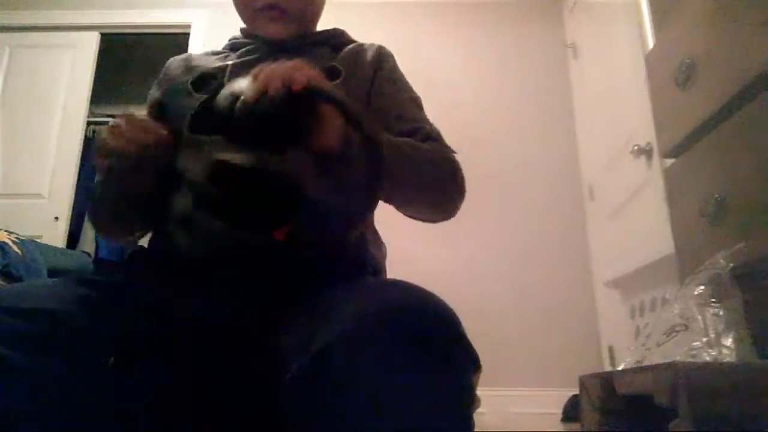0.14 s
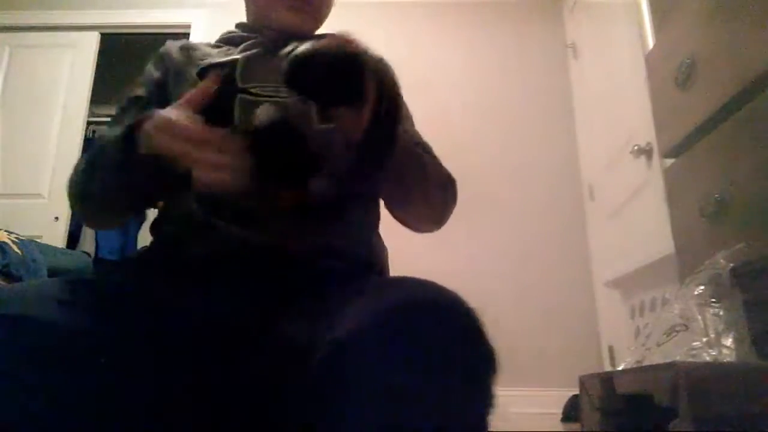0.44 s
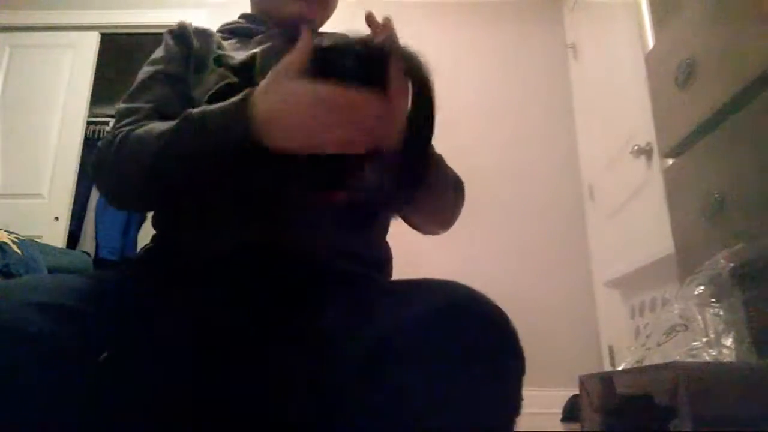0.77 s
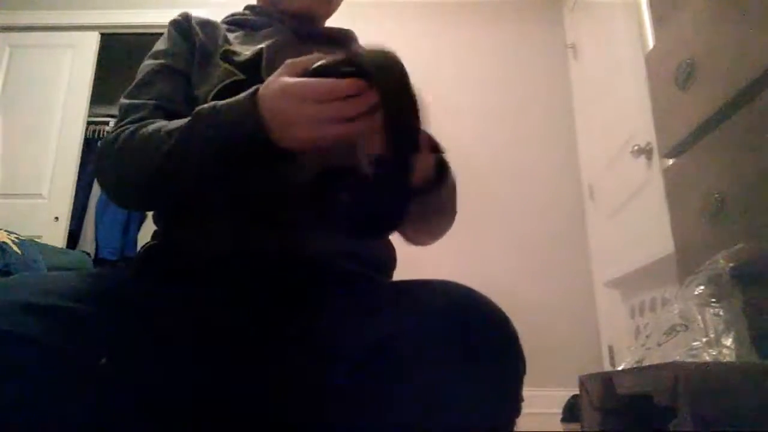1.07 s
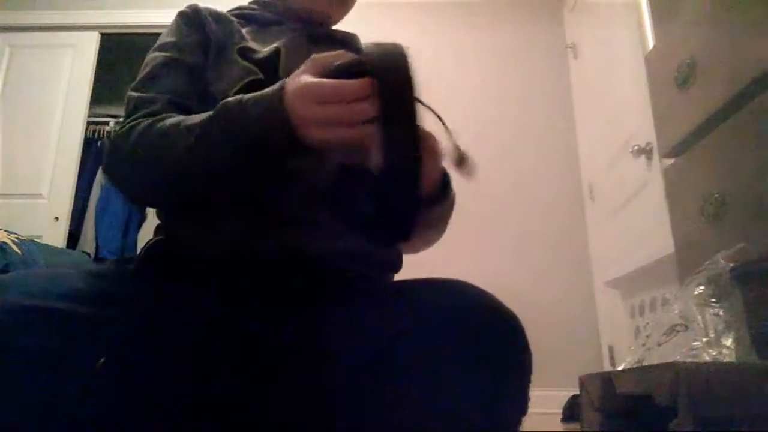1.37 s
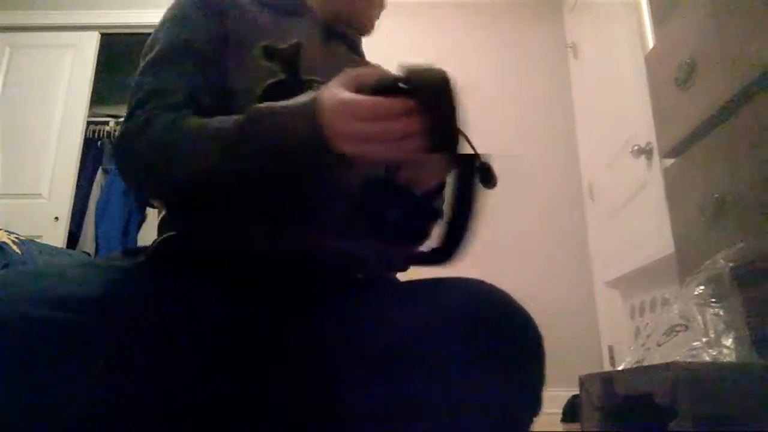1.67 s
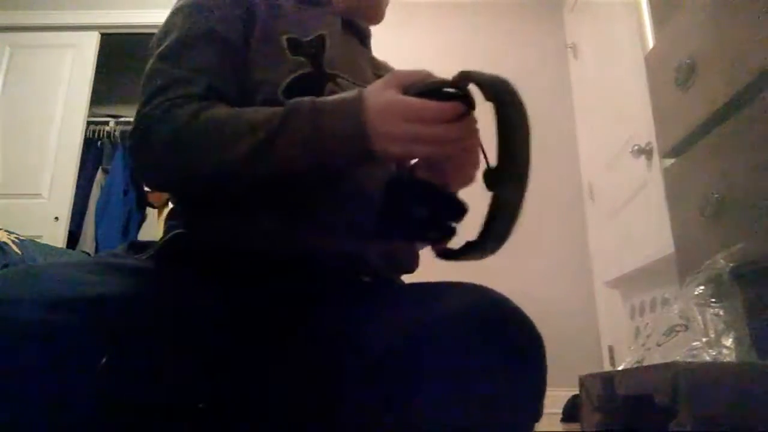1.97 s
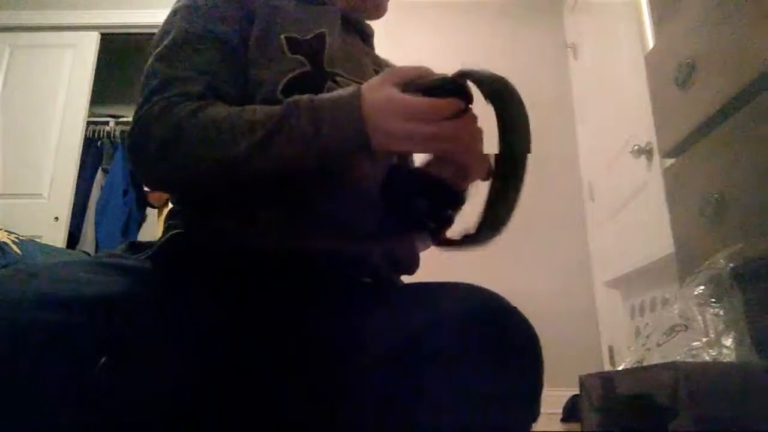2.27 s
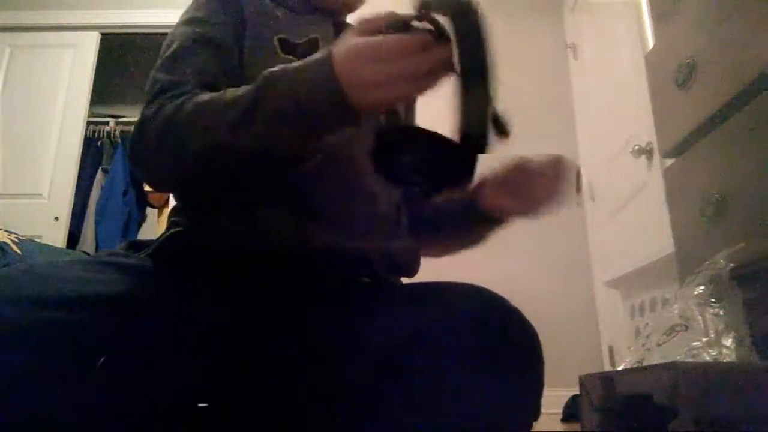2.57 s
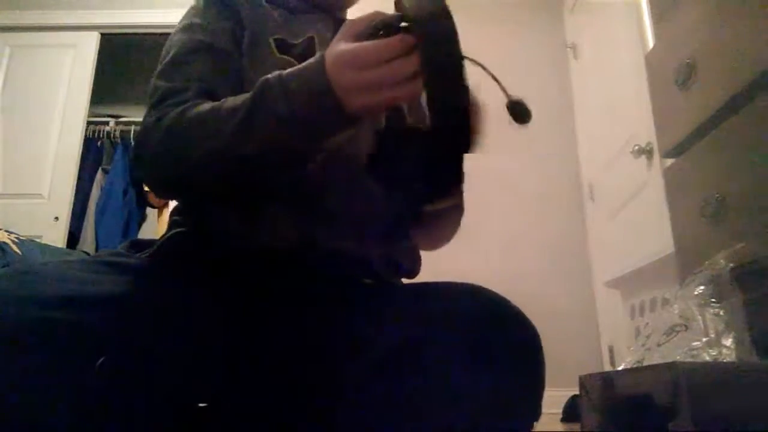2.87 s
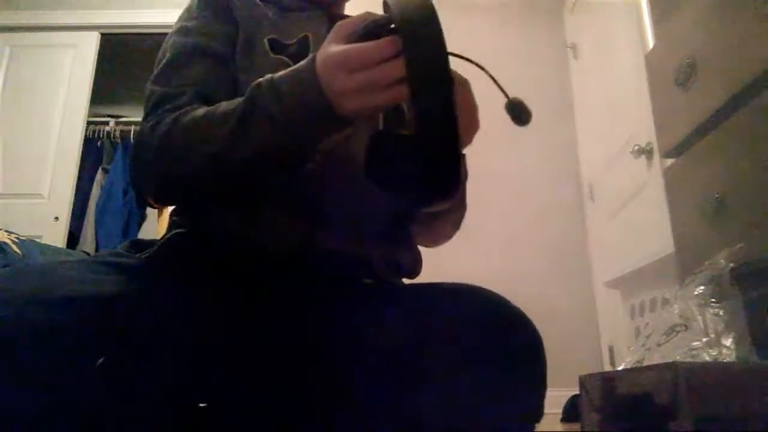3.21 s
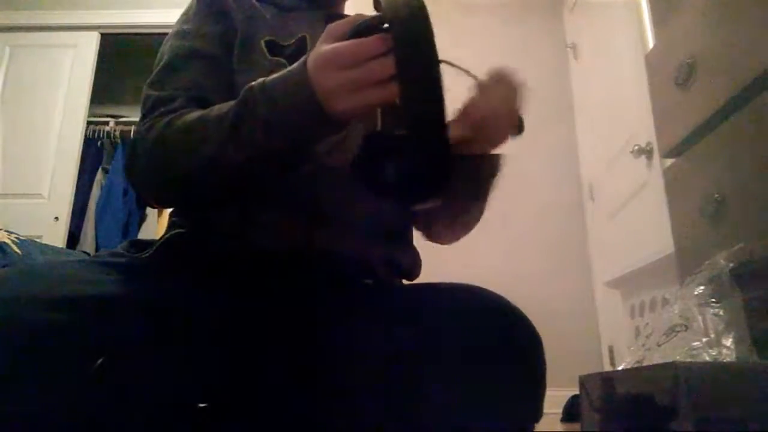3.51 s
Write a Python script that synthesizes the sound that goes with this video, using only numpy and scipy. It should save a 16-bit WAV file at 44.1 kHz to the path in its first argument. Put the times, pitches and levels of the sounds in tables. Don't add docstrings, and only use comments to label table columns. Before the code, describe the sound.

Loud muffled door slam at about three seconds, with a brief latch rattle first and shuddering walls; before it, a plastic headset is turned over with clicks, faint squeaks and cloth rustle in a small room.

```python
import sys
import numpy as np
from scipy import signal
from scipy.io import wavfile

SR = 44100
rng = np.random.default_rng(int(sys.argv[2]) if len(sys.argv) > 2 else 0)


def inscribe(sig):
    pcm = np.round(np.clip(np.atleast_2d(sig).T, -1, 1) * 32767)
    wavfile.write(sys.argv[1], SR, pcm.astype(np.int16))


def rack_gain(trim_db):
    fader = np.asarray(trim_db, float)
    return 10 ** (fader / 20)


N = 160965


def rms_one(x):
    return x / np.sqrt(np.mean(x ** 2) + 1e-20)


def at_hz(points, hz):
    table = np.array(points)
    return np.interp(np.log(hz), np.log(table[:, 0]), table[:, 1])


def drift(rate):
    pole = np.exp(-80 * np.pi * rate / SR)
    noise = rng.standard_normal(N // 40 + 2002)
    slow = signal.lfilter([1], [1, -2 * pole, pole * pole], noise)[2000:]
    return np.interp(np.arange(N) / 40, np.arange(len(slow)), rms_one(slow))


def ring(x, hz, t60):
    pole, w = rack_gain(-60 / (t60 * SR)), 2 * np.pi * hz / SR
    return signal.lfilter([0, np.sin(w)], [1, -2 * pole * np.cos(w), pole * pole], x + 1e-18)


def add(out, s, sound):
    i = int(s * SR)
    out[i:i + len(sound)] += sound[:N - i]


def butter(x, order, hz, kind="low"):
    return signal.sosfilt(signal.butter(order, hz, kind, fs=SR, output="sos"), x)


def bands(spectrum, patchy_db, grain_db=0, shape=lambda hz: 1):
    out, power = 0, 0
    together = drift(6)
    edges = 25 * 2 ** np.arange(0, 9.6, .5)
    white = rng.standard_normal((2, N)) * rack_gain(grain_db * drift(150))
    for k, (low, high) in enumerate(zip(edges, edges[1:])):
        hz = np.sqrt(low * high)
        outside = max(np.log2(spectrum[0][0] / hz), np.log2(hz / spectrum[-1][0]), 0)
        if outside > 1.2:
            continue
        flicker_db = patchy_db * (.7 * together + drift(15))
        band = butter(white[k % 2], 2, [low, high], "band")
        band = band * rack_gain(at_hz(spectrum, hz) - 18 * outside + flicker_db)
        out = out + band * shape(hz)
        power = power + np.mean(band ** 2)
    return out / np.sqrt(power)


# f/Hz, level/dB per Hz
ROOM_TONE = [(35, -6), (60, 7.5), (125, 3.5), (300, -6.5), (1000, -26.5), (3000, -47), (7000, -42.5),
             (15000, -45)]
# f/Hz, level/dB rms
HUM = [(120, -74.5), (290, -80), (1147, -92.5)]


def room_tone():
    t = np.arange(N) / SR
    hum = 0
    for hz, db in HUM:
        hum = hum + rack_gain(db + 2.5 + 2 * drift(5.1)) * np.sin(2 * np.pi * hz * t + drift(4))
    return rack_gain(-67) * bands(ROOM_TONE, patchy_db=.6) + hum


# t/s, hiss level/dB, rub level/dB
MOVEMENT = [(0, -92, -75.5), (.1, -92, -71.5), (.16, -83.5, -69), (.3, -80, -70), (.5, -75.5, -66.5),
            (.655, -83, -69.5), (.7, -74, -63), (.79, -71, -61), (.83, -77, -65), (.9, -75, -66),
            (.97, -80.5, -66.5), (1.05, -76, -64), (1.16, -85, -70.5), (1.26, -75.5, -64.5),
            (1.401, -81, -73), (1.571, -77, -64.5), (1.64, -85, -67), (2.0, -89.5, -77.5)]
# f/Hz, level/dB per Hz
CLOTH_HISS = [(3000, -19), (4500, -17.5), (6500, -11), (9000, -2.5), (11500, -4.5), (13000, 7.5),
              (16000, -1)]
# f/Hz, level/dB per Hz
CLOTH_RUB = [(88, -23), (150, 6.5), (182, -16.5), (357, -11.5), (534, -16), (1250, -19), (7000, -37.5),
             (9100, -70), (15400, -120)]


def sleeves():
    s, hiss_db, rub_db = np.transpose(MOVEMENT)
    t = np.arange(N) / SR
    hiss = rack_gain(np.interp(t, s, hiss_db) + 1.5) * bands(CLOTH_HISS, patchy_db=.5, grain_db=.7)
    rub = rack_gain(np.interp(t, s, rub_db)) * bands(CLOTH_RUB, patchy_db=1.2, grain_db=1.5)
    return hiss + rub


# t/s, peak level/dB, f/Hz, t60/s
THUDS = [(0.021, -48.5, 91, 0.036), (0.134, -45.5, 73, 0.076), (.19, -51.5, 106, 0.062),
         (.662, -46, 76.9, 0.33), (.68, -40.5, 72.5, 0.17), (0.719, -56, 116, 0.19),
         (0.767, -52.5, 119, 0.13), (1.007, -51, 166, 0.16), (1.181, -47, 74, 0.084),
         (1.369, -54, 77.6, 0.067), (1.212, -39.5, 73.4, 0.06), (1.235, -52.5, 148, 0.3),
         (1.271, -54.5, 150, 0.15), (1.661, -62, 227, 0.083), (1.813, -49, 69, 0.067),
         (1.852, -58, 96.5, 0.3), (1.879, -42.5, 110.6, 0.059)]


def thuds():
    out, t = np.zeros(N), np.arange(SR // 2) / SR
    for s, db, hz, t60 in THUDS:
        swing = np.sin(2 * np.pi * hz * t) + 0.22 * np.sin(2 * np.pi * 1.8 * hz * t + 1.95)
        soft_onset = 1 - np.exp(-t / 0.0062)
        add(out, s, rack_gain(db + 8.5 - 60 * t / t60) * soft_onset * swing)
    return out


# t/s, level/dB, rise/s, t60/s
BUMPS = [(.14, -62, 0.015, 0.12), (.2, -62.5, 0.0073, 0.043), (0.503, -59, 0.0018, 0.18),
         (0.676, -60.5, 0.014, 0.44), (0.733, -63, 0.011, 0.078), (1.04, -61, 0.016, 0.22),
         (1.184, -58, 0.027, 0.41), (1.223, -51, 0.0094, 0.16), (1.286, -69, 0.0043, 0.36),
         (1.453, -60, 0.012, 0.071), (1.635, -59, 0.026, 0.54), (1.719, -69, 0.0086, .2),
         (1.79, -71.5, 0.024, 0.56), (2.038, -66, 0.036, 0.21), (2.8, -68, 0.12, 1)]
# f/Hz, level/dB per Hz
BUMP_COLOUR = [(150, 2), (250, 4), (578, -4.5), (724, -4), (1020, -7), (6000, -42), (7800, -87),
               (13200, -120)]


def bumps():
    t = np.arange(N) / SR
    swells = 0
    for s, db, rise, t60 in BUMPS:
        decay_db = 60 * np.clip(t - s - rise, 0, None) / t60
        swells = swells + np.clip((t - s) / rise, 0, 1) * rack_gain(db - decay_db)
    return swells * bands(BUMP_COLOUR, patchy_db=.6, grain_db=1.5)


def bedroom(x):
    t60_s = .25
    t = np.arange(SR // 2) / SR
    echo = rng.standard_normal((2, len(t))) * np.clip(t / 0.0025, 0, 1)
    dull = butter(echo[0], 1, 2500) * rack_gain(-60 * t / t60_s)
    bright = 0.69 * echo[1] * rack_gain(-150 * t / t60_s)
    answer = dull + bright
    return signal.fftconvolve(x, answer / np.sqrt(np.sum(answer ** 2)))[:N]


# t/s, level/dB, tilt/dB per octave, sharp edge level/dB
TICKS = [(.5072, -42.5, -3.5, -25), (.509, -41, 1.5, -32), (.511, -44, -1.5, -19), (.642, -49, -4, -31),
         (.678, -52.5, -14, -30), (.696, -59, -8, -28), (.733, -43, -5, -22), (.745, -42, -3, -27),
         (.769, -49.5, -5, -34), (.79, -58, -6, -28), (0.808, -59, -5, -26), (.94, -52, -3, -25),
         (0.9742, -36.5, -2.5, -35), (.979, -49, -3, -39), (1.005, -36, -7, -17.5),
         (1.0065, -33.5, -1, -20), (1.025, -59, 5, -32), (1.029, -30.5, -0.5, -26.5),
         (1.033, -42.5, 4.5, -28), (1.0358, -34, -5, -30), (1.196, -51, -1, -30), (1.227, -45, -8.5, -37),
         (1.236, -42.5, -10, -32), (1.242, -45, -4, -32), (1.289, -48, -2, -33), (1.46, -51, -12, -30),
         (1.543, -55, -3, -33), (1.568, -63, 10, -7), (1.806, -62, 0, -30), (3.574, -54, -5, -36)]
# f/Hz, level/dB, t60/s
SHELL = [(540, -2, .015), (800, -5, .01), (1080, 0, .015), (1450, -2, .011), (1850, -1, .011),
         (2250, 0, .009), (2900, -5, .008), (3900, -10, .004), (6000, -18, .003)]


def ticks():
    contact_s, room_db = .0008, -10.5
    out, t = np.zeros(N), np.arange(SR // 16) / SR
    for s, db, tilt_db, edge_db in TICKS:
        luck_db = rng.normal(0, 1.5, len(SHELL))
        chatter = rng.standard_normal(len(t)) * np.exp(-t / contact_s)
        push = chatter / np.sqrt(np.sum(chatter ** 2)) * 0.59 + (t == 0)
        body = 0
        for k, (hz, mode_db, t60) in enumerate(SHELL):
            level_db = mode_db + luck_db[k] + tilt_db * np.log2(hz / 1200)
            body = body + rack_gain(level_db) * ring(push, hz, t60) * (-1) ** k
        add(out, s, rack_gain(db - 11) * (body + rack_gain(edge_db + 16.0) * chatter))
    return out + rack_gain(room_db) * bedroom(out)


# t/s, length/s, level/dB, f/Hz, width/Hz
SQUEAKS = [(0.518, 0.0069, -61, 1070, 159), (1.564, 0.047, -63.5, 1150, 200),
           (1.595, 0.039, -71, 1100, 160), (1.566, 0.036, -70, 1950, 250), (1.563, 0.038, -74, 2940, 300),
           (1.56, 0.025, -76.5, 4120, 250), (1.632, 0.039, -68.5, 2620, 170),
           (1.643, 0.025, -78, 3050, 300), (1.69, 0.018, -74.5, 2700, 200), (1.725, 0.02, -76, 2900, 348),
           (1.759, .05, -82, 2720, 350), (2.047, 0.096, -80.5, 1210, 197)]


def squeaks():
    out, t = np.zeros(N), np.arange(SR // 4) / SR
    for s, length, db, hz, width_hz in SQUEAKS:
        slips = rng.standard_normal(len(t)) * rack_gain(3 * rng.standard_normal(len(t)))
        t60 = 1.3 / width_hz
        tone = rms_one(ring(ring(slips, hz, t60), hz, t60))
        pace = np.cumsum(1 + .012 * drift(12)[:len(t)])
        tone = np.interp(pace, np.arange(len(t)), tone) * rack_gain(1.5 * drift(60)[:len(t)])
        envelope = np.clip(t / 0.0019, 0, 1) * rack_gain(-600 * np.maximum(t - length, 0))
        add(out, s, rack_gain(db) * tone * envelope)
    return out


# t/s, level/dB
DRAUGHT = [
    (2.96, -100),
    (3.01, -89),
    (3.15, -85),
    (3.19, -74.5),
    (3.42, -75.5),
    (3.56, -83.5),
]


def draught():
    t = np.arange(N) / SR
    hiss = bands(CLOTH_HISS, patchy_db=.5, grain_db=.7)
    return rack_gain(np.interp(t, *np.transpose(DRAUGHT))) * butter(hiss, 2, 9000, "high")


# t/s, level/dB, attack/s, hold/s, tilt/dB per octave
DOOR = [
    (2.97, -62.5, 0.018, 0.027, 4.5),
    (2.991, -55, 0.015, 0.025, -2),
    (3.149, -52.5, 0.016, .005, 3.5),
    (3.16, -41.5, 0.019, .005, 4.8),
    (3.177, -37.5, 0.017, 0.023, 1),
    (3.214, -42, 0.0069, 0.0075, -2.5),
    (3.282, -54.5, 0.0087, 0.0033, -7.3),
    (3.32, -54, 0.0079, .005, 0),
    (3.407, -60, 0.017, 0.016, 2.5),
]
# f/Hz, level/dB per Hz
DOOR_COLOUR = [(59, -27), (100, -2.5), (301, -4.5), (701, -12.5), (1040, -13), (1310, -14), (2950, -22.5),
               (11000, -65), (14300, -96), (22000, -120)]
# f/Hz, t60/s
HALL = [(150, 0.66), (500, 0.63), (2000, 0.58), (5000, 0.37), (12000, 0.17)]


def hallway():
    t = np.arange(N) / SR

    def swell(hz):
        late = 0.0079 * np.clip(np.log2(3000 / hz), 0, 3) / 3
        energy = np.zeros(N)
        for s, db, rise, hold, tilt_db in DOOR:
            attack = np.clip((t - s - late) / rise, 0, 1) ** 2
            decay_db = 60 * np.clip(t - s - rise - hold, 0, None) / at_hz(HALL, hz)
            energy += (attack * rack_gain(db + tilt_db * np.log2(hz / 1000) - decay_db)) ** 2
        return np.sqrt(energy)

    return bands(DOOR_COLOUR, patchy_db=.5, grain_db=1.4, shape=swell)


# t/s, level/dB, bass weight/dB per octave
SHUDDERS = [(3.002, -39.5, -7.5), (3.039, -40.5, -9.5), (3.07, -54.5, -8), (3.174, -28, -4),
            (3.194, -20, -0.5), (3.226, -22.5, 0), (3.243, -26, 3.5), (3.259, -22, 3), (3.308, -26.5, 5),
            (3.36, -33.5, 1), (3.423, -37.5, 3.5)]
# f/Hz, level/dB, t60/s
WALLS = [(60, -11.5, 0.2), (72.8, -6.5, 0.53), (81.85, -1, 0.38), (97.5, -11, 0.38), (121.7, -8, 0.24),
         (150.2, -2.5, 0.19), (195.2, -7, 0.27), (218.2, -4, 0.31), (289.7, -8, 0.22), (374, -16.5, 0.35),
         (420.3, -17, 0.25), (536, -12.5, 0.19), (645.4, -14, 0.24), (1008.6, -10.5, 0.56)]


def shudders():
    out = np.zeros(N)
    luck_db = rng.normal(0, 1.5, (len(SHUDDERS), len(WALLS)))
    for k, (hz, mode_db, t60) in enumerate(WALLS):
        blows = np.zeros(N)
        for (s, db, bass_db), luck in zip(SHUDDERS, luck_db[:, k]):
            weight_db = bass_db * max(np.log2(300 / hz), -.4)
            blows[int(s * SR)] = rack_gain(db + mode_db - 7.5 + luck + weight_db)
        out = out + ring(butter(blows + 1e-18, 2, 500), hz, t60)
    return out


def scene():
    handling = sleeves() + thuds() + bumps() + ticks() + squeaks()
    return (room_tone() + handling + draught() + hallway() + shudders())[None]


def top_cut(x):
    return signal.sosfilt(signal.butter(12, 16470, fs=SR, output="sos"), x)


# f/Hz, width/Hz, boost [ratio]
PORT = [(8400, 600, 1.1), (15650, 200, .9)]


def record(dry):
    x = butter(dry, 9, 47, "high")
    for hz, width_hz, boost in PORT:
        x = x + boost * signal.lfilter(*signal.iirpeak(hz, hz / width_hz, fs=SR), x)
    x = signal.sosfilt(signal.cheby2(12, 30, 15930, fs=SR, output="sos"), x)
    return top_cut(x)


dry = scene()
out = record(dry)
inscribe(out)
```